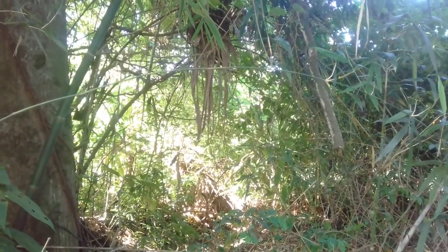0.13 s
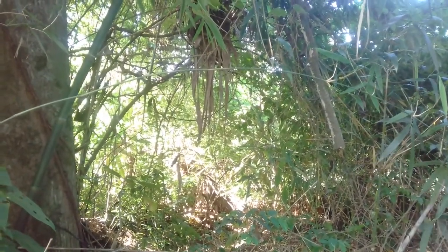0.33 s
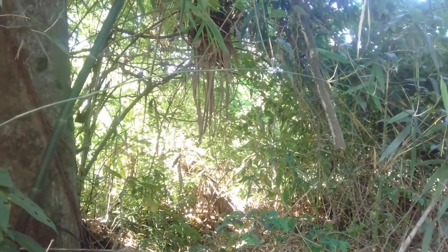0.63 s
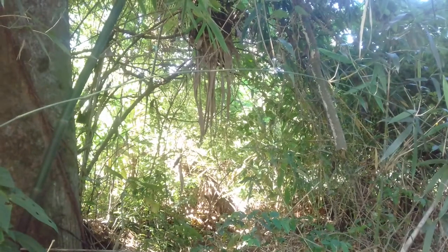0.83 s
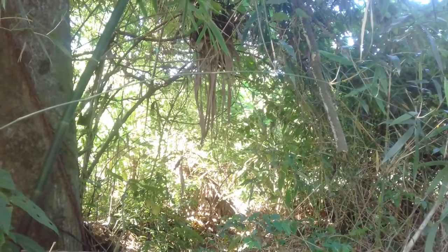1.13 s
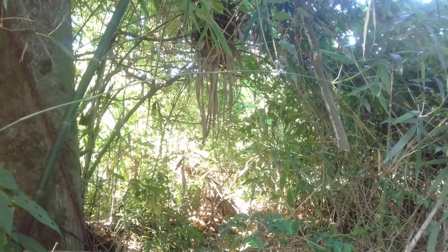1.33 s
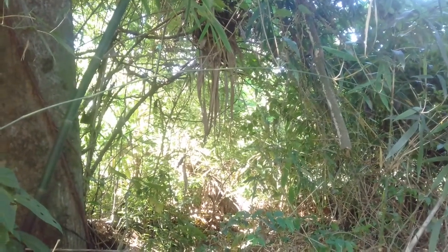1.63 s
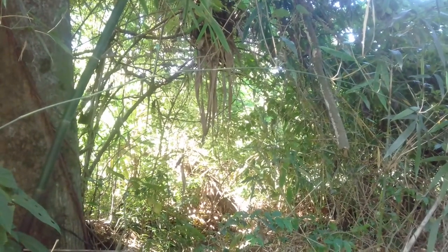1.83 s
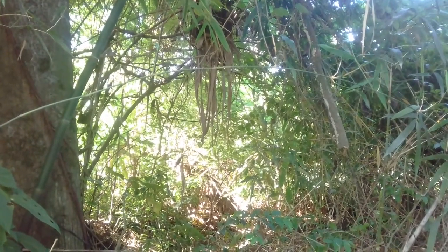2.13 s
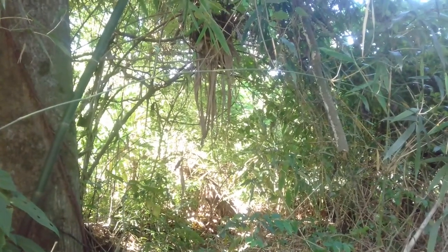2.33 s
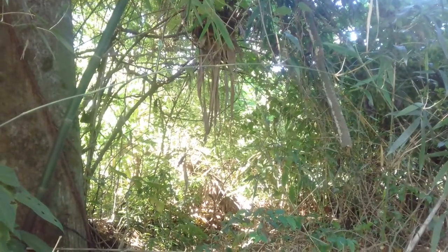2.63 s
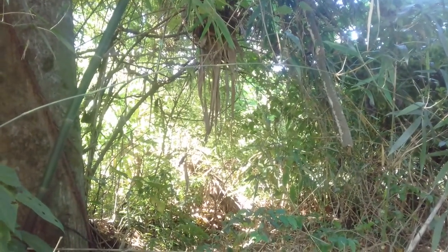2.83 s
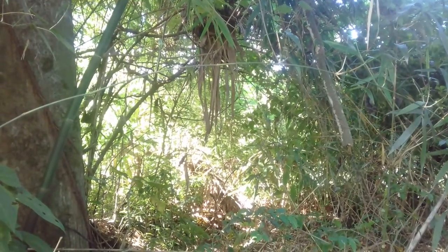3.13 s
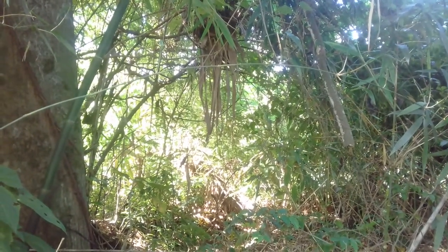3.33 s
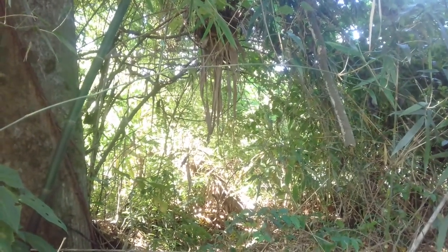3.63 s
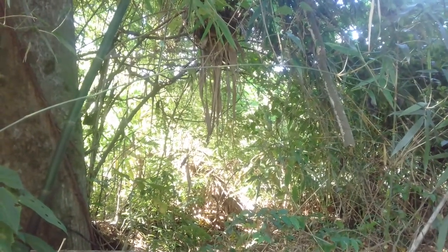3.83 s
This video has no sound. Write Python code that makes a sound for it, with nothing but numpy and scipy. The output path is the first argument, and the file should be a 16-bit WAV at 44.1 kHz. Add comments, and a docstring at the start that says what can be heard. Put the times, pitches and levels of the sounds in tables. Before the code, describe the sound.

Harsh, loud bird squawks come in quick bursts over a faint forest hiss.

```python
"""Chachalacas squabble in dense woodland, over a faint hiss, an insect's whine and a low hum.
They open with a flurry in three registers: harsh rasps of uneven clicks, thin squeals that break into
the rasp, and short falling yelps. After a second the calls thin out, and at 1.7 s a small bird chirps
far off. The quarrel flares up again, thickest from 2.3 to 2.9 s, then goes on in short bursts.
Throughout, trunks and leaves scatter the calls."""
import sys
import numpy as np
from scipy import signal
from scipy.fft import rfft, irfft, next_fast_len
from scipy.io import wavfile

SR = 44100
rng = np.random.default_rng(int(sys.argv[2]) if len(sys.argv) > 2 else 0)


def inscribe(sig):
    """Save sig as 16-bit PCM at rate SR to the path in sys.argv[1].

    A 1-D sig is mono; a 2-D sig holds one channel per row.
    Samples are clipped to [-1, 1] before scaling.
    """
    pcm = np.round(np.clip(np.atleast_2d(sig).T, -1, 1) * 32767)
    wavfile.write(sys.argv[1], SR, pcm.astype(np.int16))


N = 176400  # 4 s
TOP_HZ = 15750  # ceiling for the harmonics and the recorder


def undb(db):
    """Decibels to gain."""
    return 10 ** (np.asarray(db) / 20)


def unit(x):
    """Scale to rms 1."""
    return x / np.sqrt(np.mean(x ** 2) + 1e-18)


def noise(n):
    """Up to a second of white noise."""
    return rng.standard_normal(SR)[:n]


def wander(n, rate):
    """Random modulator: glides to a new value `rate` times a second, spread near 1."""
    knots = rng.standard_normal(2048)
    return np.interp(np.arange(n) * rate / SR, np.arange(len(knots)), knots)


def colour(x, points, treble_db=0):
    """Minimum-phase EQ through (f/Hz, level/dB) points, with a treble shelf."""
    size = next_fast_len(len(x) + 4096, real=True) * 2
    f = np.maximum(np.arange(size // 2 + 1) * SR / size, 1)
    hz, db = np.array(points, float).T
    shelf_db = treble_db * f ** 2 / (f ** 2 + 3500 ** 2)
    curve_db = np.interp(np.log(f), np.log(hz), db) + shelf_db
    cepstrum = irfft(np.log(undb(curve_db)))
    cepstrum[1:size // 2] *= 2  # folded, so nothing rings ahead of an attack
    cepstrum[size // 2 + 1:] = 0
    return irfft(rfft(x, size) * np.exp(rfft(cepstrum)))[:len(x)]


# EQ of the hiss (f/Hz, level/dB)
HISS_EQ = [(30, -7), (66, -21), (110, -13), (190, -14.5), (240, -9.5), (440, -3), (560, 1), (790, 2),
           (1290, -1), (1650, -5), (2070, -1), (2400, -9.5), (6500, -11), (9190, -9), (15500, -26)]
# partials of the hum (f/Hz, level/dB)
HUM_PARTIALS = [(126, -74), (252, -82)]
def background():
    """The bed: soft woodland hiss, a thin flickering insect whine and a steady low hum."""
    hiss_db, sway_db = -56, .4
    insect_hz, insect_db = 4850, -71.5
    t = np.arange(N) / SR
    hiss = unit(colour(rng.standard_normal(N), HISS_EQ)) * undb(hiss_db + sway_db * wander(N, 5.05))
    insect = undb(insect_db) * unit(wander(N, rate=80) * np.sin(2 * np.pi * insect_hz * t))
    hum = sum(undb(db) * unit(np.sin(2 * np.pi * hz * t)) for hz, db in HUM_PARTIALS)
    return hiss + insect + hum


def reflections(delay, t60, per_s):
    """Half a second of dying random reflections with unit energy."""
    t = np.arange(SR // 2) / SR
    hits = rng.standard_normal(len(t)) * (rng.random(len(t)) < per_s / SR)
    train = hits * (t > delay) * np.exp(-np.log(1000) * t / t60)
    return train / np.linalg.norm(train)


def stems(x, wet_db, t60):
    """Stems around a moving bird scatter every note in its own way, keeping its energy."""
    response = undb(wet_db) * reflections(0, t60, per_s=2000)
    response[0] += 1  # direct sound
    scattered = signal.fftconvolve(x, response)
    return scattered * np.linalg.norm(x) / np.linalg.norm(scattered)


# reverb of foliage, then far trees (pre-delay/s, t60/s, level/dB, low cut/Hz, high cut/Hz, echo rate/Hz)
TREE_ECHOES = [(0.009, 0.284, -7, 1530, 12250, 4340), (0.027, 0.813, -31, 780, 6700, 6400)]
def woodland(note):
    """One note heard past near stems, with its own echoes from the foliage and from far trees."""
    response = np.zeros(SR // 2)
    for delay, t60, db, low_hz, high_hz, per_s in TREE_ECHOES:
        band = signal.butter(2, [low_hz, high_hz], "bandpass", fs=SR, output="sos")
        echo = signal.sosfilt(band, reflections(delay, t60, per_s))
        response += undb(db) * echo / np.linalg.norm(echo)
    response[0] += 1
    near = stems(note, wet_db=-0.5, t60=0.065)[:SR // 4]
    return signal.fftconvolve(near, response / np.linalg.norm(response))


# breakpoints of the chirp (t/s, f/Hz, level/dB)
CHIRP_CURVE = [(1.698, 4070, -65), (1.71, 4200, -53), (1.723, 4280, -63.5), (1.738, 3350, -51.5),
               (1.755, 2680, -54), (1.775, 2620, -76.5)]
def small_bird():
    """One distant whistle that drops steeply, blurred by the leaves."""
    t = np.arange(N) / SR
    when, hz, db = np.array(CHIRP_CURVE).T
    tone = np.sin(2 * np.pi * np.cumsum(np.interp(t, when, hz)) / SR)
    env = np.interp(t, when, undb(db), left=0, right=0)
    return stems(tone * env, wet_db=7, t60=0.36)[:N]


def envelope(length, attack):
    """Time axis and fluttering envelope of one note; the release is centred on the note's end."""
    half_release_s, flutter_db = 0.0091, 1.5
    t = np.arange(int((length + half_release_s) * SR)) / SR
    flutter = unit(undb(flutter_db * wander(len(t), rate=239)))
    release = np.clip((length + half_release_s - t) / (2 * half_release_s), 0, 1)
    return t, flutter * np.minimum(t / attack, 1) * release


def buzz(hz, waver, breath_db):
    """The syrinx beats regularly: wavering harmonics give way in the treble to a puff of air a cycle."""
    rolloff_hz = 2600
    hz = hz * (1 + waver * wander(len(hz), rate=528))
    phase = 2 * np.pi * np.cumsum(hz) / SR
    harmonics = range(1, int(TOP_HZ / hz.mean()) + 1)
    tone = sum(np.cos(k * phase) / np.hypot(1, k * hz / rolloff_hz) for k in harmonics)
    breath = (1 + np.cos(phase)) * noise(len(hz))
    return unit(tone) + undb(breath_db) * unit(breath)


# throat EQ of a yelp (f/Hz, level/dB)
YELP_EQ = [(250, -31), (730, -14), (1100, -5), (1500, -3), (1850, -2.5), (2250, 3.5), (3000, -7),
           (4500, -9), (7000, -10), (8800, -6), (11500, -22), (16000, -38)]
# yelp cues (t/s, length/s, attack/s, level/dB, first f/Hz, last f/Hz, waver/share of pitch, treble/dB)
YELP_CUES = [(0.354, 0.064, 0.033, -30.5, 1029, 657, 0.075, -3),
             (.626, 0.03, 0.0097, -30.5, 810, 686, 0.063, -10),
             (0.707, 0.024, 0.014, -44, 790, 730, 0.079, -4),
             (2.099, 0.034, 0.0059, -43.5, 842, 756, 0.11, -7),
             (2.165, 0.0274, 0.0077, -27.5, 775, 687, 0.029, -7.5),
             (2.274, 0.0386, 0.028, -22, 807, 725, 0.05, 2), (2.509, 0.0248, 0.01, -25, 786, 731, 0.049, 2),
             (3.404, 0.035, 0.025, -36, 764, 696, 0.041, 5),
             (3.476, .033, 0.01, -25, 767.6, 727, 0.031, -3.5)]
def yelps():
    """Short honking notes that scoop up, then fall in pitch."""
    scoop_depth, scoop_s = 0.31, 0.0039
    out = np.zeros(N)
    for start, length, attack, db, first_hz, last_hz, waver, treble_db in YELP_CUES:
        t, env = envelope(length, attack)
        env *= np.minimum(t / attack, 1)  # a second ramp eases the note in
        fall_hz = first_hz + (last_hz - first_hz) * t / length
        scoop = 1 - scoop_depth * np.exp(-t / scoop_s)
        source = buzz(fall_hz * scoop, waver, breath_db=0.5)
        voice = unit(colour(source, YELP_EQ, treble_db))
        add(out, start, woodland(undb(db) * env * voice))
    return out


# throat EQ of a squeal (f/Hz, level/dB)
SQUEAL_EQ = [(500, -43), (1200, 2.5), (1800, -5), (3500, -7.5), (5300, -8), (7000, -9.5), (8900, -7.5),
             (11000, -20), (16000, -34)]
# squeal cues (t/s, length/s, level/dB, first f/Hz, middle f/Hz, last f/Hz)
SQUEAL_CUES = [(0.148, 0.066, -27, 1446, 1900, 2046), (.543, 0.039, -27, 1412, 1790, 1770),
               (0.785, 0.014, -24.5, 1666, 1616, 1524), (1.985, 0.042, -33.5, 1198, 1761, 1649),
               (2.436, 0.048, -27, 1336, 1840, 1936), (2.561, 0.032, -25, 1708, 1766, 1590),
               (2.711, .05, -27.5, 1754, 1700, 1493), (2.883, 0.032, -28.5, 1410, 1827, 1780),
               (3.316, 0.028, -30.5, 1130, 1834, 1658), (3.741, 0.035, -33, 1337, 1752, 1730)]
def squeals():
    """A thin high note bends through three pitches just before the voice breaks."""
    out = np.zeros(N)
    for start, length, db, *pitches in SQUEAL_CUES:
        t, env = envelope(length, attack=0.56 * length)
        arch = np.polyfit([0, 0.52, 1], pitches, 2)
        source = buzz(np.polyval(arch, t / length), waver=0.0288, breath_db=-7)
        voice = unit(colour(source, SQUEAL_EQ))
        add(out, start, woodland(undb(db) * env * voice))
    return out


def nasal(x, hz):
    """One narrow throat resonance, mixed in with the dry voice."""
    width_hz, mix_db = 480, 2.5
    return x + undb(mix_db) * signal.lfilter(*signal.iirpeak(hz, hz / width_hz, fs=SR), x)


# throat EQ of a rasp (f/Hz, level/dB)
RASP_EQ = [(150, -31), (370, -20), (500, -8.5), (610, -4.5), (760, -10.5), (1030, 0.5), (1280, -2.5),
           (1550, 0), (2100, 0), (2800, -1.5), (3900, -5), (5000, -1.5), (7200, -6), (8800, 0.5),
           (10500, -8), (12500, -18), (16000, -28)]
# rasp cues (t/s, length/s, attack/s, level/dB, nominal clap rate/Hz, treble/dB, nasal f/Hz)
RASP_CUES = [(-.04, 0.042, 0.012, -30.5, 522.3, -9, 2380), (0.058, .088, 0.038, -25, 548.2, 0, 2080),
             (0.184, 0.036, .008, -24.5, 534.5, 6.5, 1940),
             (0.223, 0.039, 0.0048, -28.5, 541.6, -4.5, 2050), (0.449, 0.068, 0.027, -26, 527, 2, 1940),
             (0.575, .04, 0.0041, -26, 530.8, 3, 1830), (0.761, 0.025, 0.024, -27, 538, -2.5, 1960),
             (0.796, 0.04, 0.0021, -26, 539.7, 3, 1890), (0.985, 0.024, 0.013, -47, 511, -23, 1880),
             (1.208, 0.05, 0.014, -30.5, 489.3, 0.5, 2070), (1.529, 0.051, 0.021, -29.5, 501.3, 0, 2370),
             (1.872, .046, 0.021, -29, 503.3, 1, 2560), (2.018, 0.034, 0.0054, -27.5, 536.5, 2, 2420),
             (2.35, 0.051, 0.017, -27, 521.7, 2.5, 2090), (2.42, 0.032, 0.0088, -35.5, 541, 4, 2270),
             (2.465, 0.035, 0.02, -25, 547.7, 4.5, 2060), (2.504, 0.016, 0.0051, -27.5, 739, 5, 2140),
             (2.582, 0.037, 0.012, -23.5, 809.3, 5, 2280), (2.731, 0.0368, 0.014, -22, 812, 7.5, 1680),
             (2.77, 0.045, 0.0036, -24.5, 524.3, 6, 2160), (2.873, 0.02, 0.0045, -28.5, 532, 3.5, 2223),
             (2.911, 0.028, .005, -23, 522.5, 4, 2000), (3.194, 0.058, 0.019, -26, 522.3, 5, 2080),
             (3.345, 0.038, 0.0037, -26, 535.3, 5, 2030), (3.392, 0.038, 0.0064, -38.5, 519, -23, 2150),
             (3.647, .052, 0.036, -24, 504, 5, 2170), (3.769, 0.037, 0.0096, -25.5, 513, 1, 1850),
             (3.961, 0.063, 0.024, -30.5, 529, 0.5, 1870)]
def rasps():
    """Sharp claps of the syrinx, uneven in time and size and slowing a little, ring the throat."""
    jitter, slowing, shimmer_db, breath_db = .17, 0.0999, 5.5, -6
    out = np.zeros(N)
    for start, length, attack, db, clap_hz, treble_db, nasal_hz in RASP_CUES:
        t, env = envelope(length, attack)
        slips, strengths = rng.standard_normal((2, 128))
        claps, at = np.zeros(len(t)), 0
        for slip, size in zip(slips, undb(shimmer_db * np.tanh(strengths))):
            at += np.exp(jitter * slip + slowing * (at / length - .5)) / clap_hz
            if at > t[-1]:
                break
            claps += size * np.sinc((t - at) * SR)
        source = unit(claps) + undb(breath_db) * noise(len(t))
        voice = unit(colour(nasal(source, nasal_hz), RASP_EQ, treble_db))
        add(out, start, woodland(undb(db) * env * voice))
    return out


def add(out, start, x):
    """Mix a sound in at `start` seconds, trimmed to the track."""
    i = int(start * SR)
    a, b = max(i, 0), min(i + len(x), N)
    if b > a:
        out[a:b] += x[a - i:b - i]


def scene():
    """Mono mix of all the birds among the trees, over the bed."""
    return (background() + rasps() + squeals() + yelps() + small_bird())[None]


def record(dry):
    """The recorder cuts the top of the treble."""
    return signal.sosfilt(signal.ellip(10, .2, 80, TOP_HZ, fs=SR, output="sos"), dry)


dry = scene()
out = record(dry)
inscribe(out)
```